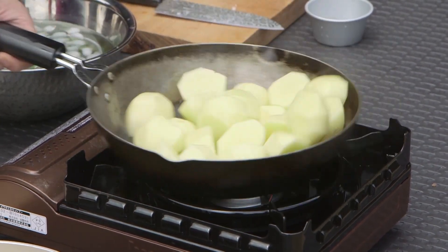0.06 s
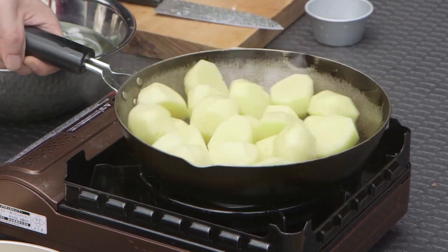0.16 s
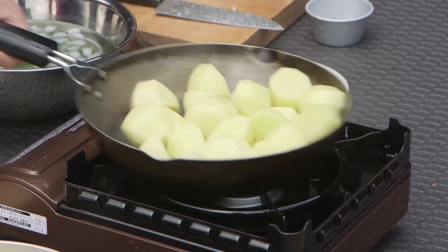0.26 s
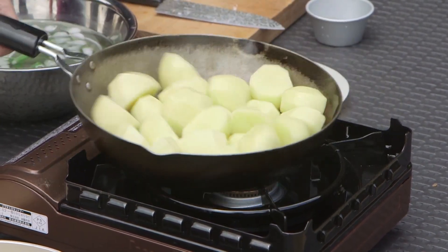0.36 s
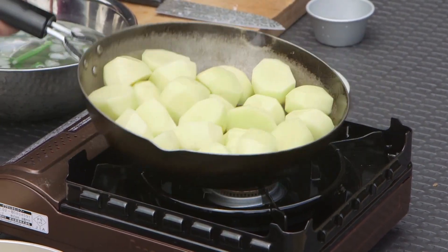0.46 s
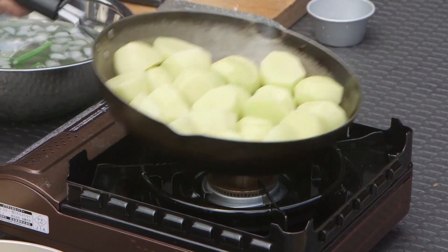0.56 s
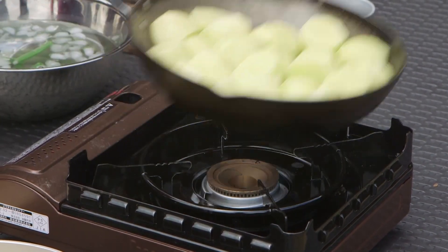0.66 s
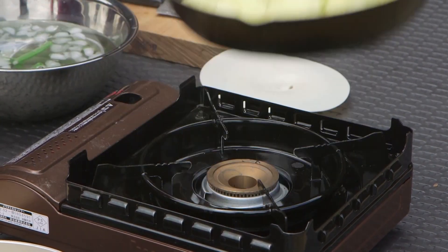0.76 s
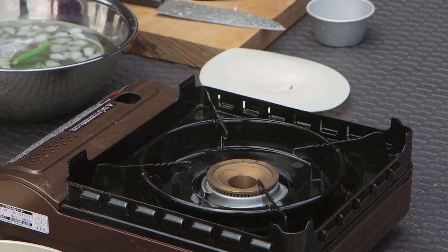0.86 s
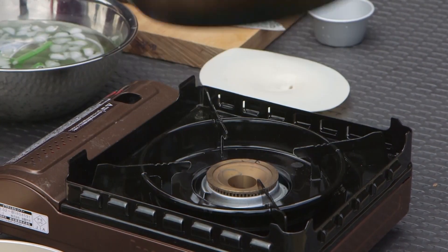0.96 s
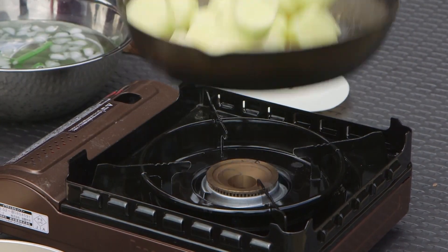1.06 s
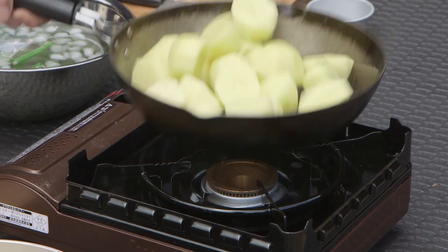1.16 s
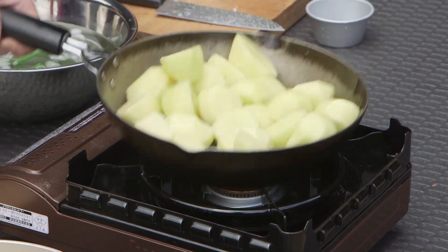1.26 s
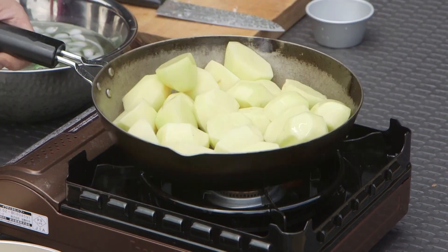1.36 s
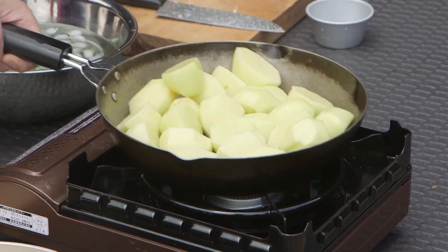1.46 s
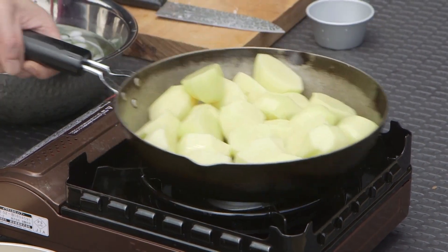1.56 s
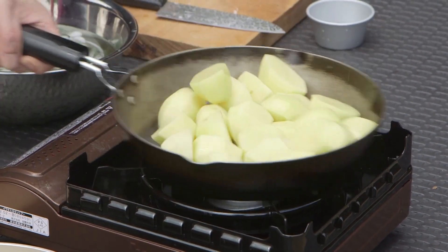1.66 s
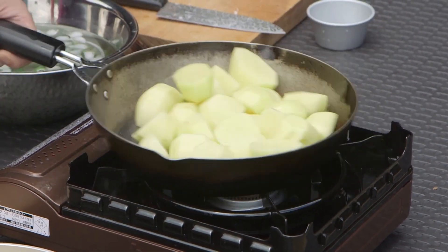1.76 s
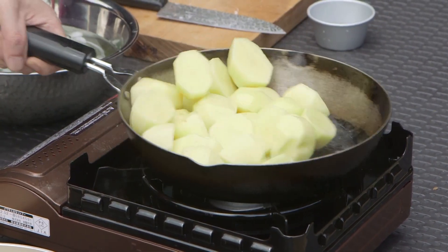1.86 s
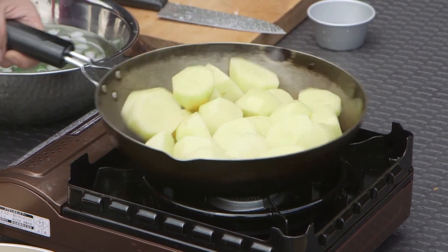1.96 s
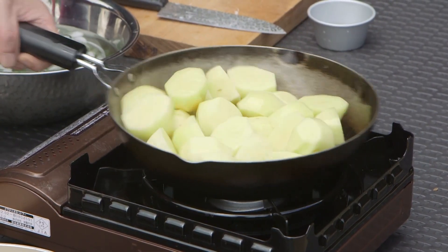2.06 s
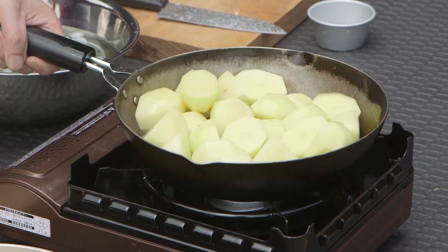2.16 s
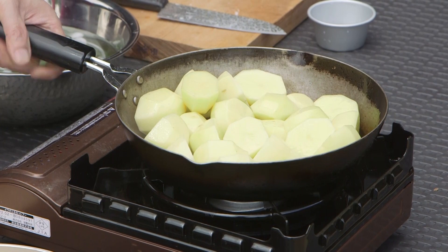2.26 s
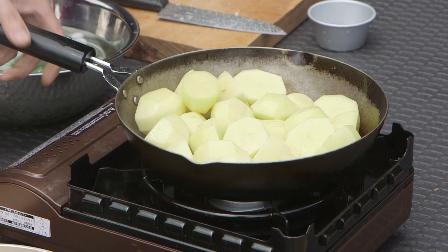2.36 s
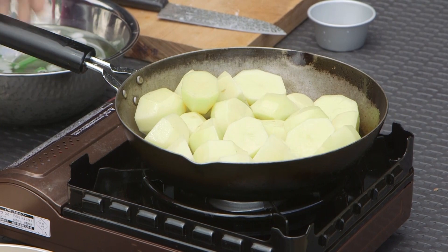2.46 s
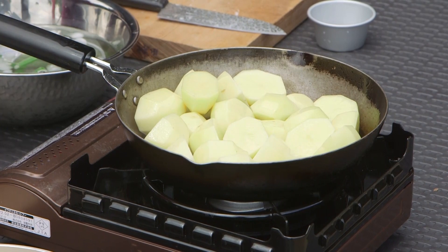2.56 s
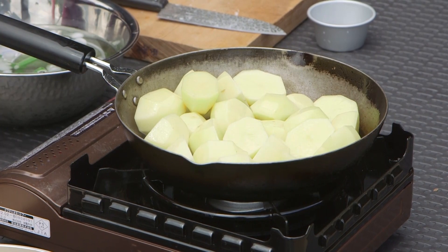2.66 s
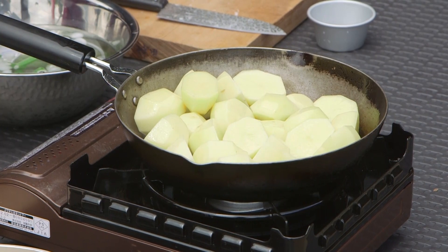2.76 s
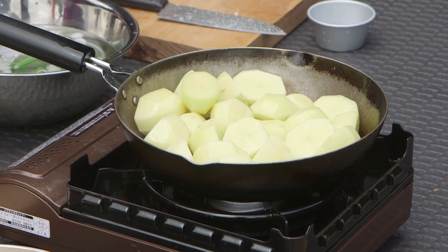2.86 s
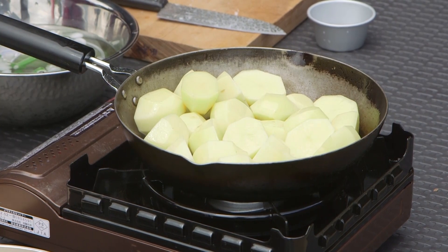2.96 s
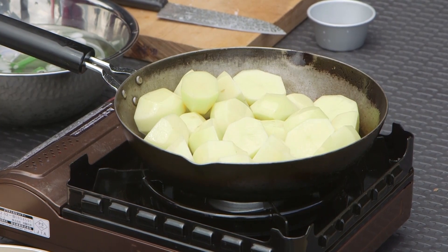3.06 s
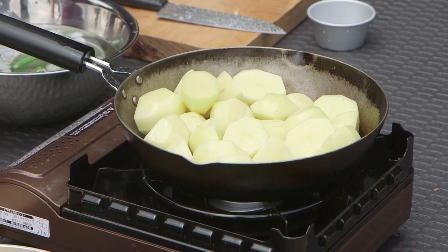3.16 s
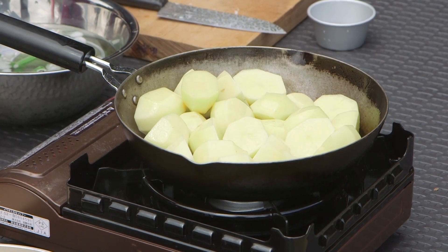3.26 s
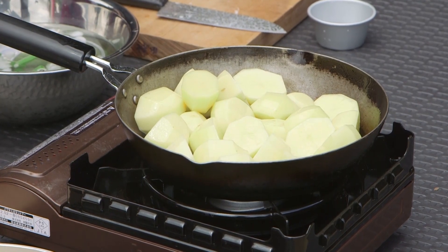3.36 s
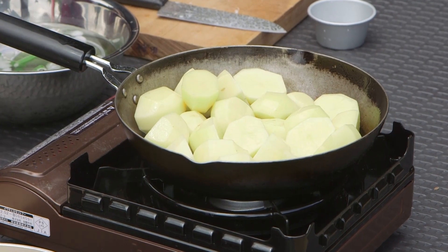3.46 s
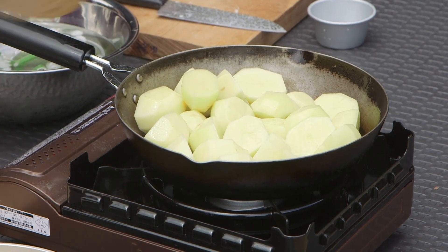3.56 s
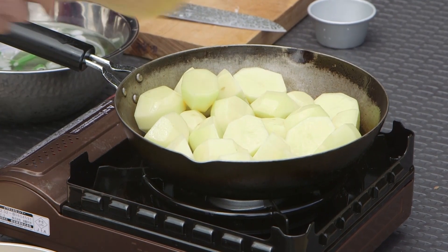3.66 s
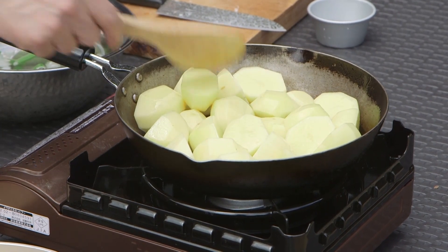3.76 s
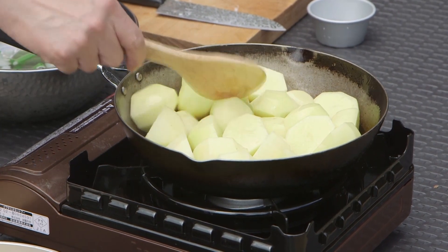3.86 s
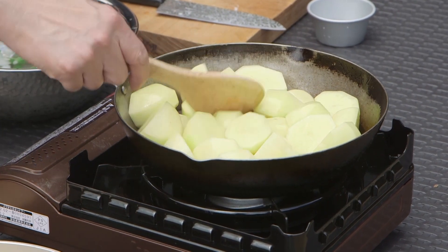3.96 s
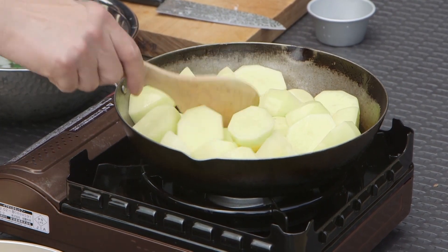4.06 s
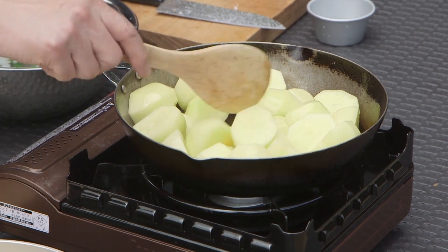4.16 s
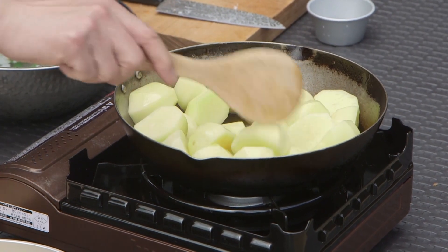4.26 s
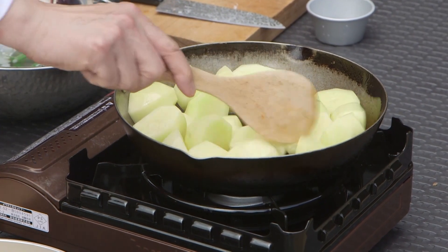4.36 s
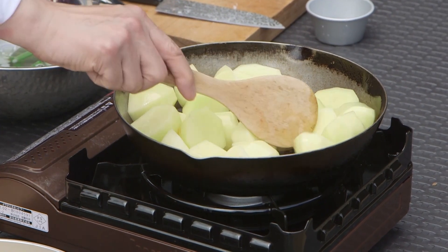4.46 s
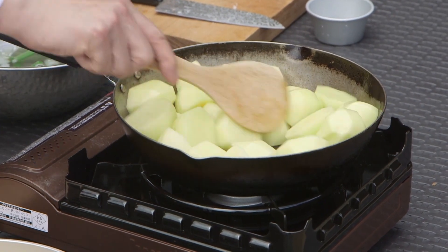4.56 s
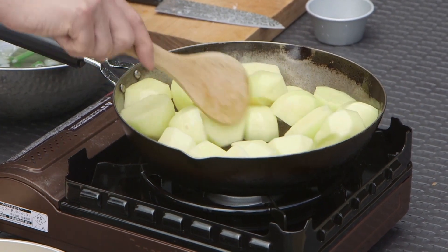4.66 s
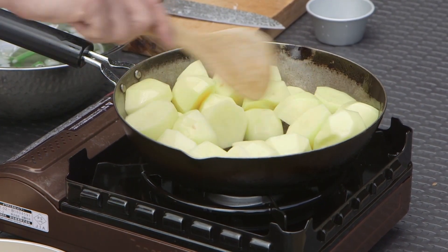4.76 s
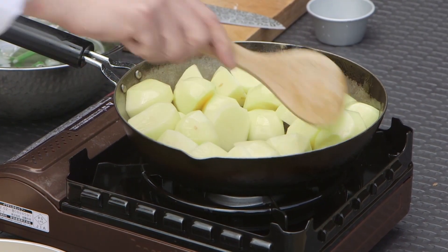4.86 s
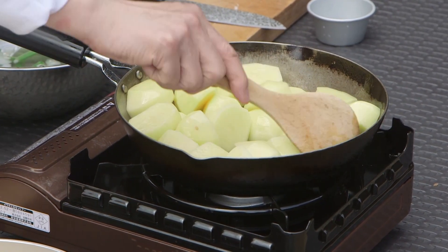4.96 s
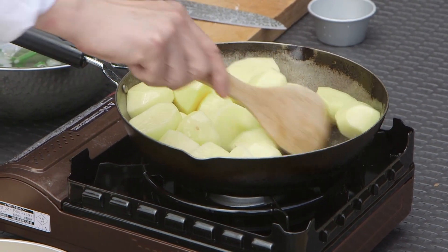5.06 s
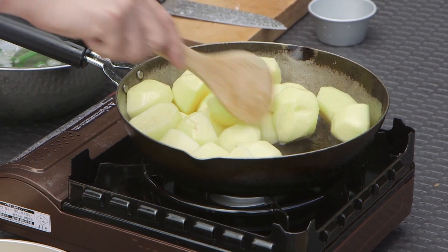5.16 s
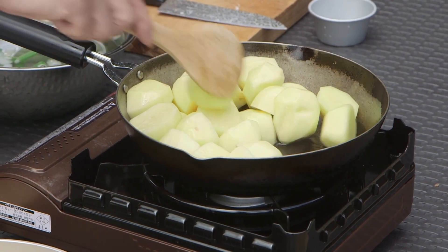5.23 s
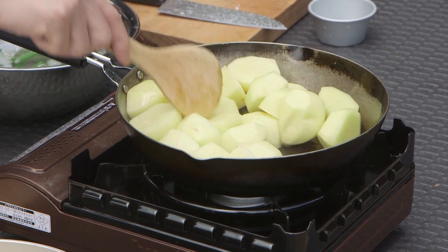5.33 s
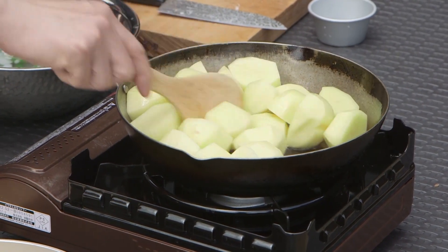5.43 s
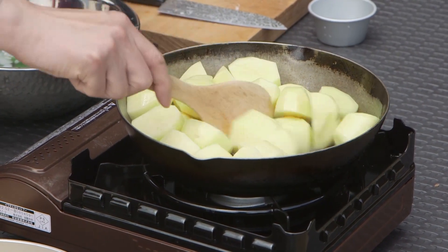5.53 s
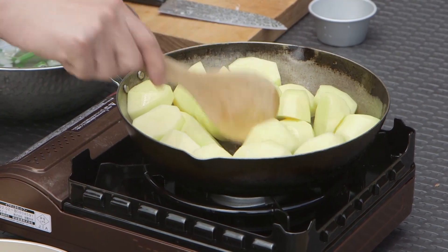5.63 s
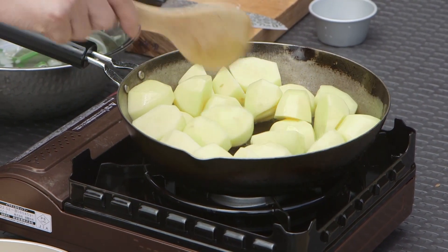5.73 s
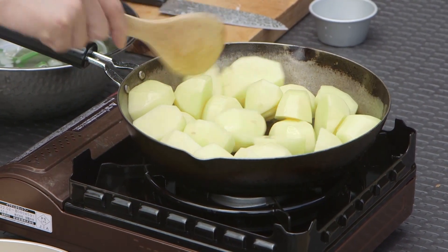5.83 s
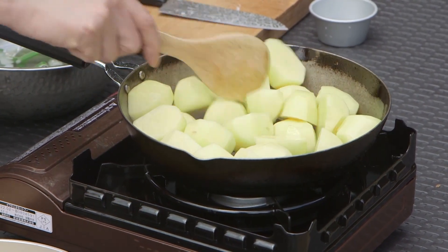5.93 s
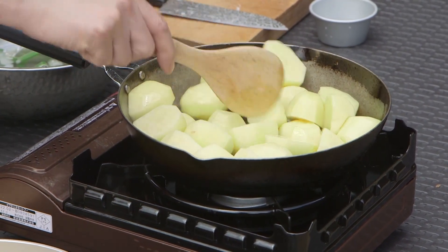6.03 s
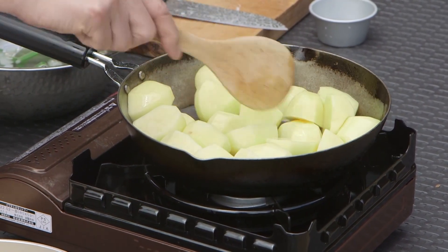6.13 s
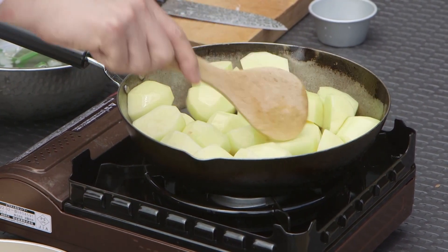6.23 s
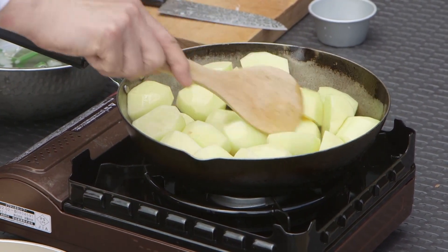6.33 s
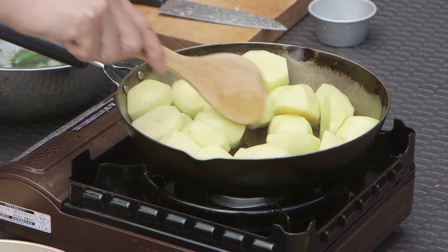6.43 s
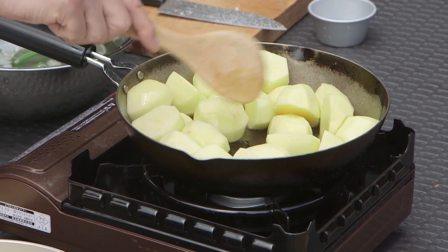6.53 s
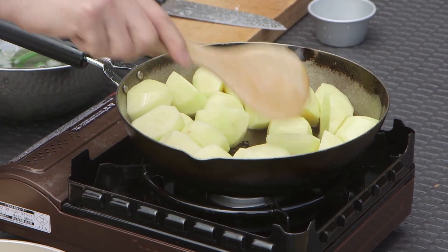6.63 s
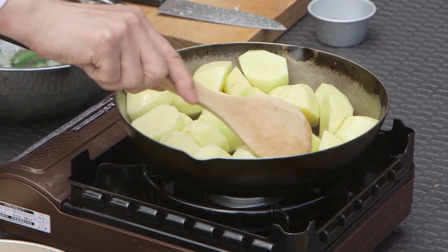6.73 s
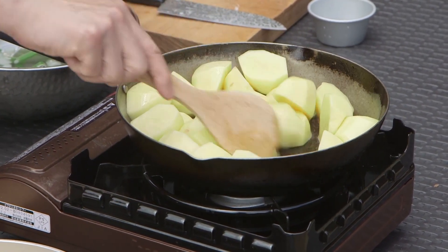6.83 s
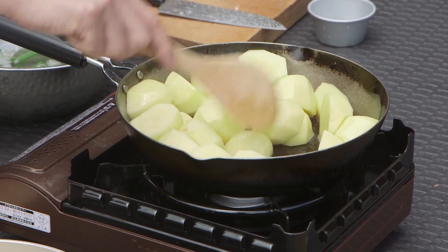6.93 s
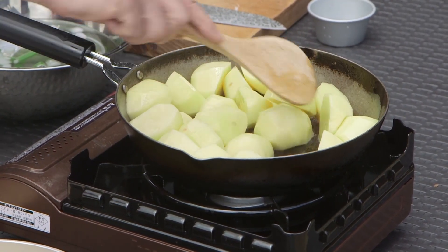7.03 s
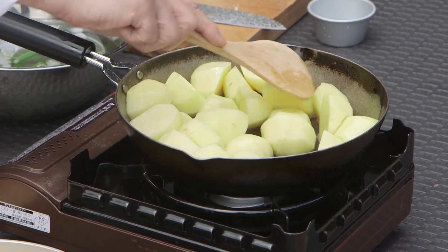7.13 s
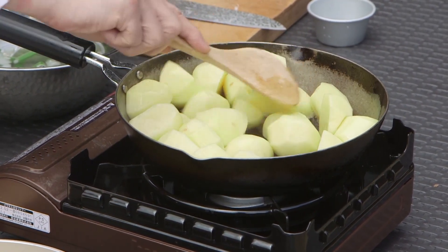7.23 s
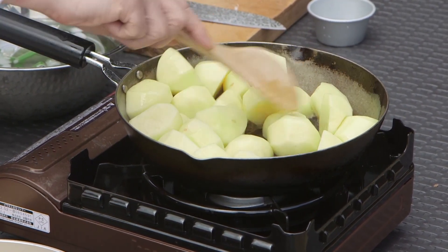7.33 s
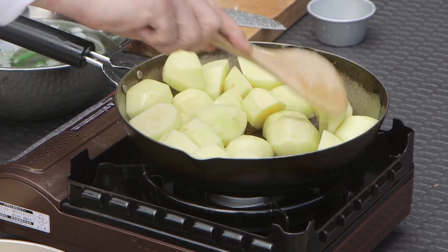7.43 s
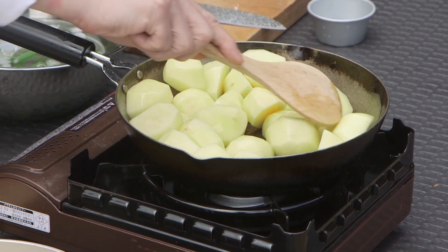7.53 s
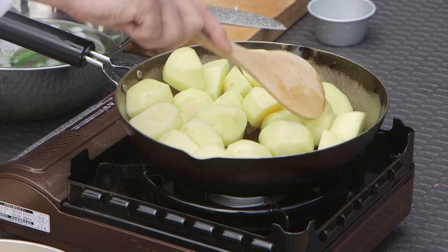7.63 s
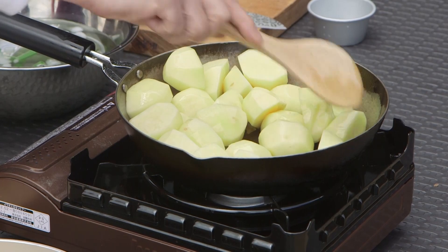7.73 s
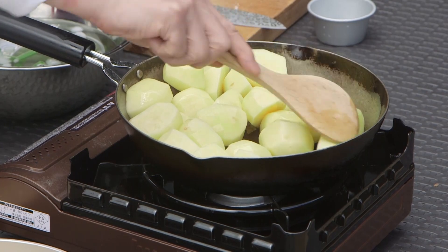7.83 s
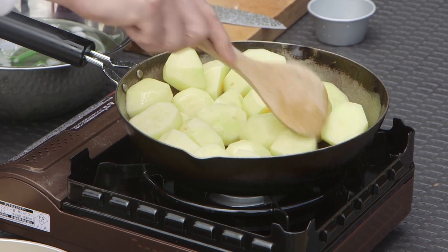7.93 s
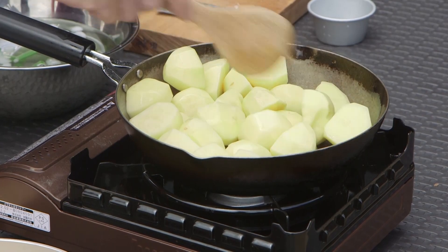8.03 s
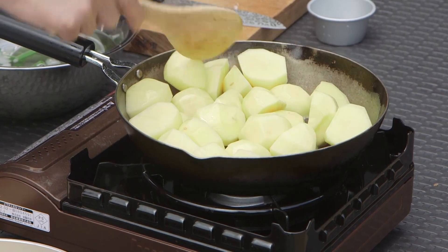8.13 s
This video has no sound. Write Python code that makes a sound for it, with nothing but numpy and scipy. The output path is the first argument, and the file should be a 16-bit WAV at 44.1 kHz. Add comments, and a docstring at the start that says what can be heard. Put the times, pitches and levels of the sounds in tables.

```python
"""A steel pan scrapes and clanks on a burner grate while potato chunks sizzle in its oil.
Close up at a portable gas stove, a stereo pair of microphones hears the pan shaken, lifted for a toss,
set down with a clank and shaken again. Then a wooden spatula turns the chunks: they tumble and knock
on the pan while the oil spits. Every movement brings wet faces onto the hot steel, so the sizzle
flares up and slowly settles."""
import sys
import numpy as np
from scipy import signal
from scipy.fft import rfft, irfft, next_fast_len
from scipy.io import wavfile
from scipy.ndimage import map_coordinates

SR = 44100
rng = np.random.default_rng(int(sys.argv[2]) if len(sys.argv) > 2 else 0)


def generate_wav(sig):
    """Save sig (samples, or channels by samples) to the path in sys.argv[1] as 16-bit PCM at SR."""
    pcm = np.round(np.clip(np.atleast_2d(sig).T, -1, 1) * 32767).astype(np.int16)
    wavfile.write(sys.argv[1], SR, pcm)


N = 361253
TOP_HZ = 15950  # upper edge of the microphones' band

# the hand shakes, lifts, tosses and sets down the pan:
# start_s, length_s, rumble_db, flare_db, brightness_db
PAN_MOVEMENTS = [(-.06, 0.4, -33, -33.5, -2.5), (0.255, 0.26, -36, -38, 5), (0.537, .14, -49.5, -30, 1.5),
                 (1.037, 0.059, -50, -34, 4), (1.328, 0.046, -31, -47, -9), (1.454, 0.2, -36, -33, 5.5),
                 (1.657, 0.51, -34, -36.5, 6), (2.2, 0.17, -50, -32.5, 1.5), (2.41, 0.3, -67, -35, 4)]
# the spatula pushes the chunks: start_s, length_s, tumbling_db, flare_db, brightness_db
SPATULA_PUSHES = [(3.77, 0.19, -49, -34, -1), (3.95, 0.072, -41, -31.5, 1), (4.1, 0.27, -47, -39, 7.5),
                  (4.376, 0.36, -40.5, -32, -1.5), (4.68, 0.19, -53, -33, 3), (4.97, 0.22, -43, -42, -20),
                  (5.34, 0.072, -35.5, -48, 15), (5.588, 0.25, -43, -35, 4.5), (5.87, 0.32, -41, -30.5, -4),
                  (6.287, 0.37, -46, -34, -4.5), (6.773, 0.22, -40.5, -38, -12),
                  (7.193, 0.35, -53, -36.5, 4), (7.487, 0.1, -40.5, -34.5, -9),
                  (7.683, 0.26, -49.5, -60, -2), (7.97, 0.31, -53, -37, 6)]


def frying():
    """Water boils out of the potatoes into hot oil: sizzle with sparse crackle, spray, fizz, bubbling."""
    # spectra of the four layers: frequency_hz, level_db
    sizzle_spectrum = [(300, -52), (700, -15), (1100, -14), (1700, -10), (2300, -4.5), (3300, -2),
                       (4500, -2.5), (7000, -3), (11000, -7), (16000, -30)]
    spray_spectrum = [(2500, -14.5), (4500, -6.5), (7000, -0.5), (9500, -0.5), (12000, -11), (15800, -1.5)]
    fizz_spectrum = [(6000, -35), (9000, -4.5), (11000, 1.5), (13000, 1), (15800, -17.5)]
    bubbling_spectrum = [(200, -48), (500, -6.5), (800, -8), (1050, -2), (1400, 1), (2000, 1.5), (3200, 2),
                         (6000, -14)]
    sizzle_gain = boiling(rest_db=-34.5, offset_db=-1.5, tilt=-0.1, dry_s=0.16, duck=0.49)
    spray_gain = boiling(rest_db=-37.5, offset_db=-4, tilt=0.51, dry_s=0.3, duck=0.9)
    fizz_gain = boiling(rest_db=-42, offset_db=-9, tilt=1.2, dry_s=0.15, duck=2.9)
    bubbling_gain = boiling(rest_db=-42, offset_db=-9, tilt=-0.53, dry_s=0.83, duck=0.53)
    flutter = amp(0.82 * wobble(30) + 0.13 * wobble(8))
    sizzle = bubbles(per_s=2400, pitch_hz=3185, cycles=2.3, scatter_db=2) + amp(1) * rush()
    crackle = bubbles(per_s=130, pitch_hz=3300, cycles=2.3, scatter_db=4.5, samples=200)
    spray = bubbles(per_s=4500, pitch_hz=8170, cycles=1.65, scatter_db=7.5) + amp(-1) * rush()
    fizz = bubbles(per_s=4500, pitch_hz=11400, cycles=3.5, scatter_db=3) + amp(-15) * rush()
    bubbling = bubbles(per_s=1200, pitch_hz=1657, cycles=0.77, scatter_db=3.5) + amp(7.5) * rush()
    return flutter * (sizzle_gain * coloured(sizzle + amp(-9) * crackle, sizzle_spectrum)
                      + spray_gain * coloured(spray, spray_spectrum)
                      + fizz_gain * coloured(fizz, fizz_spectrum)
                      + bubbling_gain * coloured(bubbling, bubbling_spectrum))


def boiling(rest_db, offset_db, tilt, dry_s, duck):
    """Gain of a frying layer: a steady simmer, and a flare at each movement that fades as faces dry."""
    # the sizzle dips as the chunks fly up and again as the pan drops: middle_s, half_width_s, depth_db
    dips = [(.95, .13, -5.5), (1.34, 0.12, -2.5)]
    t = np.arange(N) / SR
    dip_db = sum(db * np.exp(-((t - middle_s) / width_s) ** 2) for middle_s, width_s, db in dips)
    flares = [(start_s, length_s, flare_db + offset_db + tilt * brightness_db)
              for start_s, length_s, _, flare_db, brightness_db in PAN_MOVEMENTS + SPATULA_PUSHES]
    flaring = movements(flares, rise_s=0.026, stop_s=dry_s)
    return np.hypot(amp(rest_db), flaring) * amp(duck * dip_db)


def bubbles(per_s, pitch_hz, cycles, scatter_db, samples=96):
    """Bursting bubbles: tiny damped rings, most small and a few large, from all over the pan."""
    count = int(per_s * N / SR)
    when, side = rng.random((2, count))
    tone, strength, life, phase = rng.standard_normal((4, count, 1))
    hz = np.clip(pitch_hz * np.exp(0.4 * tone), 300, TOP_HZ)
    turns = hz * np.arange(samples) / SR
    fade = amp(scatter_db * np.minimum(strength, 3)) * np.exp(-turns / (cycles * np.exp(0.4 * life)))
    indices = ((when * N).astype(int)[:, None] + np.arange(samples)).ravel()
    angle = side[:, None] * np.pi / 2
    left = fade * np.cos(angle) * np.sin(2 * np.pi * turns + 0.46 * phase)
    right = fade * np.sin(angle) * np.sin(2 * np.pi * turns - 0.48 * phase)
    return unit(np.array([np.bincount(indices, mic.ravel(), N + samples)[:N] for mic in (left, right)]))


def spits():
    """A large drop bursts with a snap and a ring of a few cycles, echoed by the pan's wall."""
    # loud spits of oil: start_s, relative_db, pitch_hz
    loud_spits = [(0.434, -27, 3320), (0.522, -29.5, 6100), (1.172, -28, 5530), (1.234, -31, 3720),
                  (1.553, -30, 7190), (2.343, -31, 2630), (2.364, -27.5, 2200), (2.453, -25, 5860),
                  (2.6, -22, 2850), (2.918, -29, 5800), (3.098, -25, 2490), (3.122, -28, 2890),
                  (3.29, -27, 3830), (3.396, -27, 3370), (3.666, -26, 3500), (4.017, -24.5, 3830),
                  (4.087, -29.5, 3750), (4.701, -23.5, 3270), (4.81, -30, 2120), (5.612, -28, 1900),
                  (5.863, -30, 2200), (6.616, -27, 5400), (6.665, -28.5, 2970), (6.947, -26.5, 3230),
                  (7.459, -26.5, 3360), (7.7, -24, 3400), (7.724, -30, 3040), (8.012, -27.5, 10000)]
    small_spits = [(when * N / SR, -33 + 4 * (size - 0.5), 3800 * 2 ** (0.88 * (tone - 0.5)))
                   for when, size, tone in rng.random((24, 3))]
    out, t = np.zeros((2, N)), np.arange(SR // 40) / SR
    for start_s, db, hz in loud_spits + small_spits:
        ring = np.sin(2 * np.pi * hz * t) * np.exp(-hz * t / 2)
        wall = 0.13 * rng.standard_normal((2, len(t))) * decay(t, t60_s=0.018)
        wall[:, 0] = 1  # the direct path
        echoed = signal.fftconvolve(wall, ring[None], axes=1)[:, :len(t)]
        snap = signal.lfilter([1], [1, -0.5], rng.standard_normal(len(t))) * decay(t, t60_s=0.008)
        burst = low_cut(echoed + 0.2 * snap, edge_hz=1660)
        add(out, start_s, amp(db + 2) * burst / np.std(burst[:, :SR // 250]))
    return out


def pan_on_grate():
    """The base grinds over the grate in small slips and chatters on landing; pan, prongs, stove ring."""
    # strokes of the base over the grate: start_s, length_s, level_db
    scrapes = [(0, 0.075, -27.5), (.15, 0.06, -29), (.285, 0.061, -22), (.385, 0.022, -31),
               (1.35, 0.062, -31.5), (1.455, 0.029, -23.5), (1.65, 0.11, -38), (1.755, 0.019, -26),
               (1.835, 0.08, -26.5), (2.0, 0.064, -22), (2.11, 0.035, -38), (7.532, .04, -36.5)]
    # the pan strikes the grate: start_s, level_db, chatter_t60_s, dull_share (0-1), prong_db
    landings = [(.168, -29, 0.24, 0, -48), (.315, -33, .12, 0.7, -45), (0.398, -18, 0.06, 0.8, -50),
                (1.333, -12.5, 0.2, 0.29, -27), (1.356, -28, 0.09, 0, -29), (1.46, -26, 0.075, 0.5, -32.5),
                (1.492, -24, 0.036, 0.8, -50), (1.651, -24.5, 0.24, 0, -26), (1.676, -27, 0.081, 0.1, -38),
                (1.746, -16.5, 0.11, 0.6, -40), (1.773, -18, .1, 1, -47), (1.835, -20.5, 0.39, 0.14, -41),
                (1.892, -24.5, .1, 0.5, -43), (2.042, -20.5, 0.72, 0.26, -44), (7.546, -28, .12, 0.2, -50)]
    # resonances of the pan on the stove: pitch_hz, width_hz, level_db
    pan_modes = [(353, 6.9, 3), (392, 9.8, -3), (450, 26, 4.5), (556, 41, 2.5), (569.4, 32, 5.5),
                 (643, 6.6, 9.5), (750, 68, -14), (856, 28, 5.5), (910, 43, 5.5), (974, 30, 5.5),
                 (1074, 94, -0.5), (1343, 100, -0.5), (1437, 21, -9), (1610, 160, -7), (2330, 70, -5),
                 (3050, 24, 0)]
    # ring of the grate's prongs: pitch_hz, level_db, t60_s
    prong_modes = [(3340, -9, 0.18), (3650, 5.5, 0.085), (3870, -3, 0.063), (4070, 4, 0.046)]
    # spectra of steel grinding and chattering: frequency_hz, level_db
    grind_spectrum = [(150, 17), (350, -1.5), (900, 8.5), (1300, -44), (2500, -4), (3700, -2.5),
                      (5500, -19), (12000, -54)]
    chatter_spectrum = [(100, -20), (400, -3), (1000, 6), (2000, 4), (3000, 8), (3900, -0.5), (5500, -2),
                        (6600, -12.5), (8000, -13), (15000, -40)]
    strokes = movements(scrapes, rise_s=0.0065, stop_s=0.032)
    rumble = movements(PAN_MOVEMENTS, rise_s=0.022, stop_s=0.039)
    grinding = np.hypot(strokes, amp(-1.5) * rumble)  # the base drags lightly between strokes
    bright, dull, clink = np.zeros(N), np.zeros(N), np.zeros((2, N))
    t = np.arange(SR // 3) / SR
    for start_s, db, t60_s, dull_share, prong_db in landings:
        blow = amp(db) * decay(t, t60_s) * attack(t, rise_s=0.00022)
        add(bright, start_s, blow * (1 - dull_share))
        add(dull, start_s, blow * (0.17 + 0.23 * dull_share))
        add(clink, start_s, amp(prong_db) * struck(prong_modes, t))
    slips = rush(rate_hz=410)
    force = grinding + dull
    ring = ringing(force * slips, pan_modes) / np.std(ringing(slips, pan_modes))
    rasp = amp(-5) * force * coloured(slips, grind_spectrum)
    clank = bright * coloured(rush(rough_db=0.5, rate_hz=480), chatter_spectrum)
    boom = (amp(-0.5) * rumble + 0.51 * dull) * stove_case(rush())
    return amp(-1) * ring + low_cut(rasp + clank, edge_hz=180) + clink + boom


def knocks():
    """A soft contact wakes the pan's low modes, a hard one the high ones too; a duller one follows."""
    # spatula and chunks knock twice on the pan: start_s, first_db, sharpness_hz, second_db
    double_knocks = [(.940, -39.5, 2000, -44), (2.994, -39, 1670, -38), (3.926, -33, 1330, -34),
                     (3.984, -35, 800, -30.5), (4.5, -41, 850, -37), (5.477, -21.5, 2480, -23),
                     (5.792, -42, 700, -36), (5.981, -30, 800, -25.5), (6.032, -40, 800, -35.5),
                     (6.883, -28.5, 840, -22.5), (7.509, -36, 1500, -39)]
    # the pan's ring, damped by the food: pitch_hz, level_db, t60_s
    damped_modes = [(524, -.5, 0.078), (596, -3, 0.052), (680, -10, 0.04), (850, -4.5, 0.024),
                    (993, -1, 0.032), (1190, -3, 0.02), (1326, -1.5, 0.035), (1610, 1, .038),
                    (1750, -6, 0.029), (2110, -1.5, .018), (2860, -2, 0.032)]
    hz, mode_db, t60_s = np.transpose(damped_modes)
    out, t = np.zeros((2, N)), np.arange(SR // 5) / SR
    for start_s, first_db, first_hz, second_db in double_knocks:
        contacts = [(start_s, first_db, first_hz), (start_s + 0.0235, second_db, 0.88 * first_hz)]
        for contact_s, db, sharpness_hz in contacts:
            contact_db = 20 * np.log10((hz / sharpness_hz) / (1 + (hz / sharpness_hz) ** 4))
            modes = np.transpose([hz, mode_db + contact_db, t60_s])
            ring = low_cut(struck(modes, t), edge_hz=70)
            add(out, contact_s, amp(db) * ring / np.std(ring[:, :SR // 100]))
    return out


def tumbling():
    """Chunks roll and drop softly; the stove's case booms under them."""
    # spectrum of the rolling chunks: frequency_hz, level_db
    roll_spectrum = [(50, -38), (90, -20), (130, -17), (220, -4), (400, -3), (560, 4.5), (800, -18.5),
                     (1500, -23.5)]
    pushes = movements(SPATULA_PUSHES, rise_s=0.011, stop_s=0.059)
    toppling = amp(1.2 * wobble(16))  # the chunks fall one by one
    boom = stove_case(rush(rough_db=2, rate_hz=28))
    roll = coloured(rush(rough_db=5.5, rate_hz=70), roll_spectrum)
    return pushes * toppling * (amp(1) * boom + amp(-5) * roll)


def stove_case(drive):
    """The case booms in a few low modes and is too small to radiate deep bass."""
    # resonances of the sheet metal: pitch_hz, width_hz, level_db
    case_modes = [(109, 5, -4), (155.4, 7.9, 6), (187.3, 12.6, -1), (201, 48, -4), (268, 55, -9),
                  (362, 47, -25)]
    radiation = [(60, -34), (85, -36), (100, -1), (300, -10), (450, -6), (900, -25)]
    return coloured(ringing(drive, case_modes), radiation)


def thuds():
    """Dull bumps: a short hollow note followed by a lower boom."""
    # soft bumps: start_s, level_db
    bumps = [(.71, -41.5), (1.075, -40), (2.66, -44), (3.015, -41), (3.381, -41), (3.767, -40.5),
             (4.195, -38.5), (4.454, -41), (4.972, -38.5), (5.344, -37), (6.351, -41), (6.53, -42),
             (7.163, -46), (7.303, -40.5)]
    note_gain, boom_gain, t = np.zeros(N), np.zeros(N), np.arange(SR // 3) / SR
    for start_s, db in bumps:
        add(note_gain, start_s, amp(db) * decay(t, t60_s=0.29) * attack(t, rise_s=0.0011))
        add(boom_gain, start_s, amp(db) * decay(t, t60_s=0.59) * attack(t, rise_s=0.031))
    note = coloured(rush(), [(120, -16), (240, -5), (330, 6), (410, 0.5), (540, -27), (1500, -50)])
    boom = coloured(rush(), [(70, -30), (115, 0.5), (160, -8), (220, 4), (300, -32), (700, -47)])
    return note_gain * note + amp(-2) * boom_gain * boom


def burner_and_hum():
    """Behind the pan lie a faint rumble of burner and air, and a low wavering hum."""
    # spectrum of burner and air: frequency_hz, level_db
    air_spectrum = [(20, 1), (45, -19), (80, -7.5), (150, 1), (400, -0.5), (900, -5.5), (3000, -14)]
    air = amp(-49.5) * coloured(rush(), air_spectrum)
    hum = amp(-66.5 + wobble(1.9)) * np.sin(2 * np.pi * 62 * np.arange(N) / SR + 0.5 * wobble(4.3))
    return air + hum


def rush(rough_db=0, rate_hz=200):
    """Noise, partly alike at the two microphones, whose strength wavers by rough_db at rate_hz."""
    # likeness of left and right: frequency_hz, correlation
    likeness = [(60, 0.13), (130, 0.039), (290, 0.41), (640, 0.38), (1400, 0.36), (3100, 0.59),
                (6800, 0.89), (15000, 0.17)]

    def mid_and_side(hz):
        angle = np.arccos(along(likeness, hz)) / 2
        return np.array([np.cos(angle), np.sin(angle)])

    mid, side = filtered(rng.standard_normal((2, N)), mid_and_side)
    return unit(np.array([mid + side, mid - side]) * amp(rough_db * wobble(rate_hz)))


def struck(modes, t):
    """Stereo ring of (pitch_hz, level_db, t60_s) modes, a little different at every blow."""
    hz, db, t60_s = np.transpose(modes)[:, :, None]
    gain = amp(db + rng.standard_normal(hz.shape)) * decay(t, t60_s)
    phase = 0.7 * rng.standard_normal(hz.shape) + 0.35 * rng.standard_normal((2,) + hz.shape)
    polarity = (-1) ** np.arange(len(hz))[:, None]  # neighbouring modes swing against each other
    partials = polarity * gain * np.sin(2 * np.pi * hz * t + phase)
    return partials.sum(axis=1) * attack(t, rise_s=0.0003)


def movements(rows, rise_s, stop_s):
    """Joint gain of (start_s, length_s, level_db) movements that each rise, hold and die away."""
    power = np.zeros(N)
    for start_s, length_s, db, *_ in rows:
        t = np.maximum(np.arange(N) / SR - start_s, 0)
        release = np.exp(-np.clip((t - length_s) / stop_s, 0, 20))
        power += (amp(db) * attack(t, rise_s) * release) ** 2
    return np.sqrt(power)


def attack(t, rise_s):
    """Exponential rise from 0 to 1."""
    return 1 - np.exp(-t / rise_s)


def decay(t, t60_s):
    """A fall of 60 dB every t60_s."""
    return amp(-60 * t / t60_s)


def wobble(rate_hz):
    """A smooth random curve, rate_hz knots a second."""
    knots = rng.standard_normal(int(N * rate_hz / SR) + 4)
    return map_coordinates(knots, [np.arange(N) * rate_hz / SR])


def ringing(x, modes):
    """x through a body's (pitch_hz, width_hz, level_db) resonances."""
    return filtered(x, lambda hz: sum(amp(db) * 1j * hz * width / (pitch**2 - hz**2 + 1j * hz * width)
                                      for pitch, width, db in modes))


def coloured(x, spectrum):
    """x through a broad (frequency_hz, level_db) spectrum, scaled to rms 1."""
    return unit(filtered(x, lambda hz: amp(along(spectrum, hz))))


def low_cut(x, edge_hz):
    """x with the bass below edge_hz taken away."""
    return signal.sosfilt(signal.butter(2, edge_hz, "high", fs=SR, output="sos"), x)


def filtered(x, response):
    """x times a complex response of frequency."""
    size = next_fast_len(N + SR // 2)
    return irfft(rfft(x, size) * response(np.fft.rfftfreq(size, 1 / SR)), size)[..., :N]


def along(points, hz):
    """(frequency_hz, value) points read on a log axis."""
    point_hz, values = np.transpose(points)
    return np.interp(np.log(hz + 1), np.log(point_hz + 1), values)


def add(track, start_s, sound):
    """Mix a sound in at start_s."""
    start = max(0, round(start_s * SR))
    part = track[..., start:start + sound.shape[-1]]
    part += sound[..., :part.shape[-1]]


def amp(db):
    """Decibels to gain."""
    return 10 ** (np.asarray(db) / 20)


def unit(x):
    """Scaled to rms 1."""
    return x / np.sqrt(np.mean(x ** 2) + 1e-20)


def scene():
    """Everything heard at the stove: oil, pan and chunks over the burner's rumble."""
    background = burner_and_hum()
    return frying() + spits() + pan_on_grate() + knocks() + tumbling() + thuds() + background


def record(dry):
    """The two microphones differ in colour and keep nothing above the band limit."""
    # balance of the pair: frequency_hz, left_minus_right_db
    balance = [(60, 13.5), (110, -0.5), (200, 2), (380, -1.5), (700, -3.5), (1300, -3.5), (2400, -1.5),
               (4400, 1.8), (8100, -2.5), (15000, -7)]
    share = np.array([[0.5], [-0.5]])  # half the difference to each side
    return filtered(dry, lambda hz: amp(share * along(balance, hz)) * (hz < TOP_HZ))


dry = scene()
out = record(dry)
generate_wav(out)
```